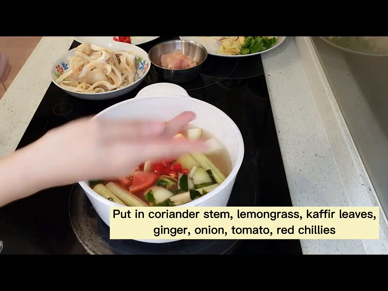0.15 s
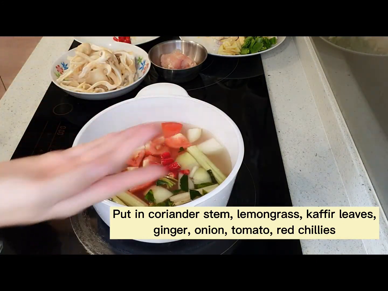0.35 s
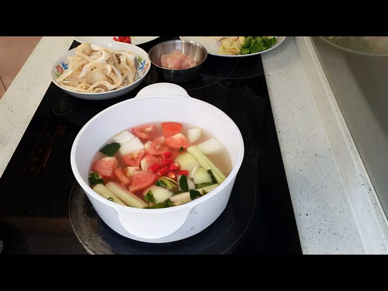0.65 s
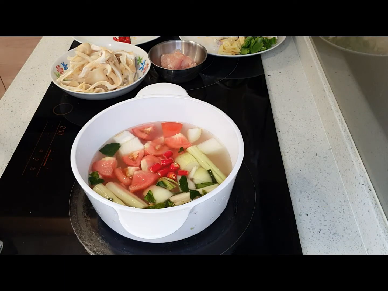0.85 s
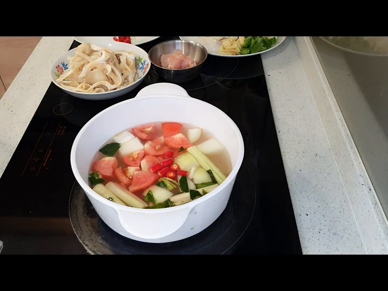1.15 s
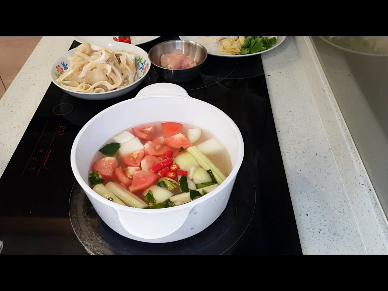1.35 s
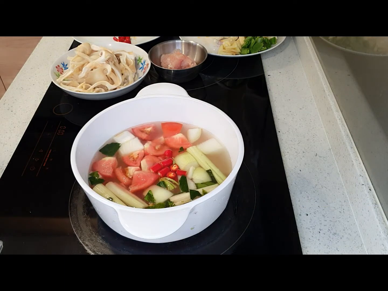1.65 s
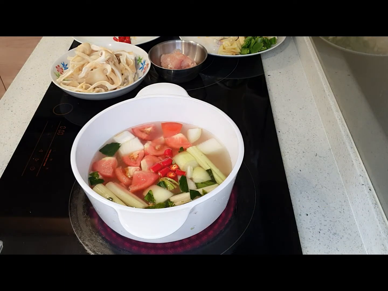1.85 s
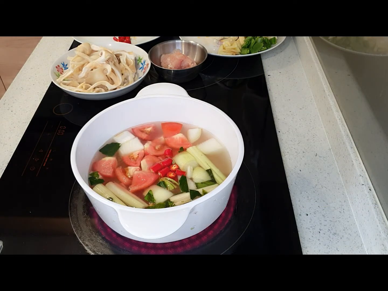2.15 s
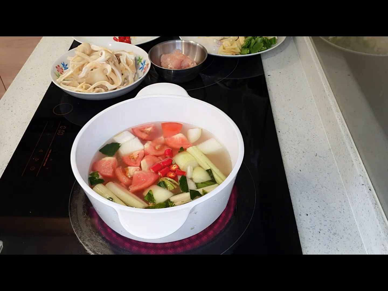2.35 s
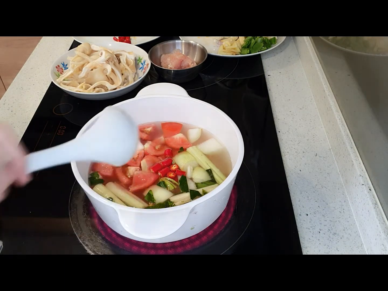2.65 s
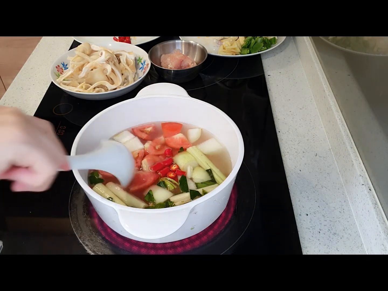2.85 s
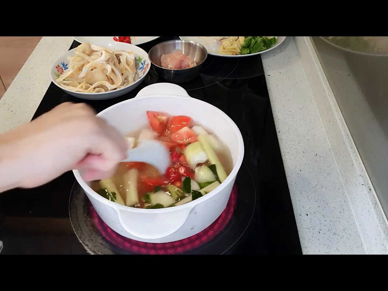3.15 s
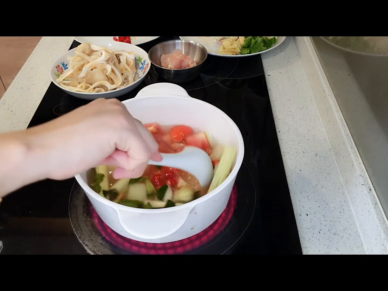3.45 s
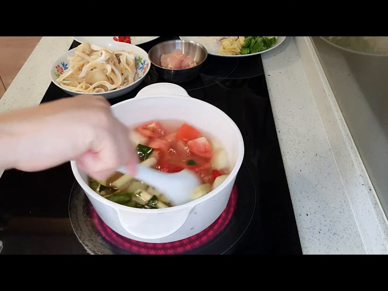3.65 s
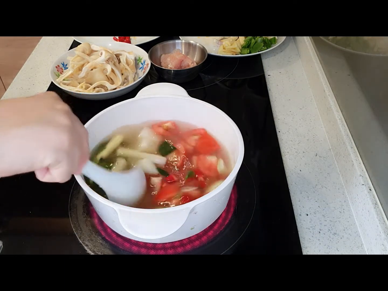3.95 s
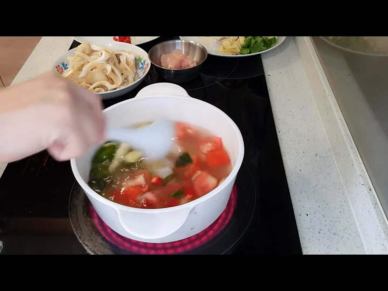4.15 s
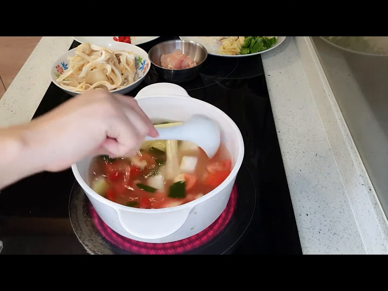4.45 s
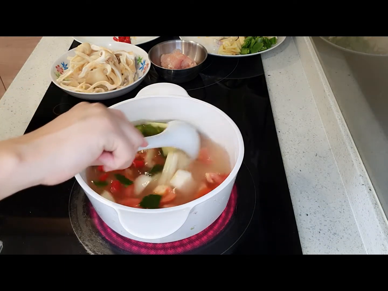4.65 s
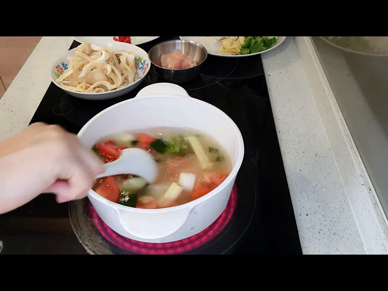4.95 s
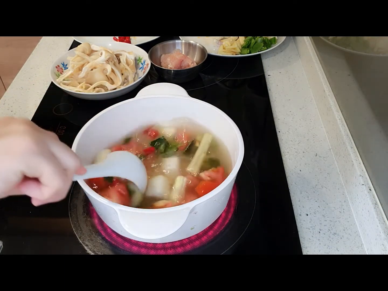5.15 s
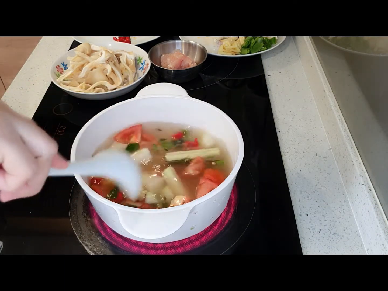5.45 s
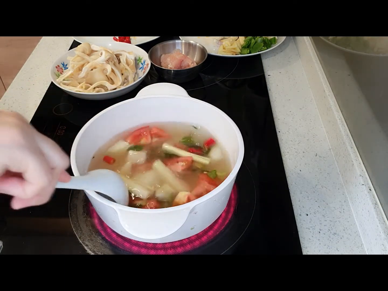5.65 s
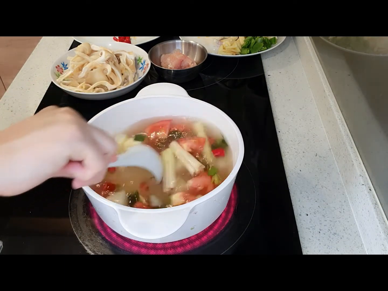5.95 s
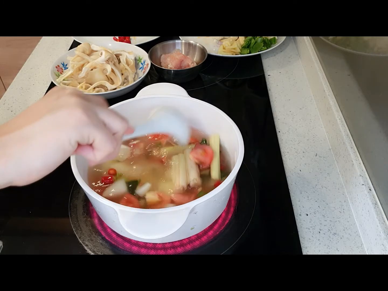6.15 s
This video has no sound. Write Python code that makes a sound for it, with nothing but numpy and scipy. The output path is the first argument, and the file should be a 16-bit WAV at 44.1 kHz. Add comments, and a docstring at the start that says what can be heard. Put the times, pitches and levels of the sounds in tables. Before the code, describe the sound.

In a hard-walled kitchen, a steady low hum and soft air rush run throughout. Faint dull thuds and cloth rustles come first, then a tiny scrape and quick bright crockery clink around two seconds. A ladle knocks sharply inside a pot at three, broth sloshes and bubbles softly with wet ticks, a dull bump follows near five, and a ringing rim tap comes later. Close stereo microphone above the pot.

```python
"""Over a hob's hum and a soft rush of air, the listener first hears a cook's dull thuds and rustling cloth.
A ladle scrapes and clinks on crockery, knocks on a pot's floor, then taps its rim with a faint second blow.
Struck bodies are sums of decaying modes behind a noisy crack, and random slips make the scrape.
The stirred soup is swelling filtered noise and resonant bubbles; crackles and rising blips are small wet ticks.
Overlapping reflections in a hard-walled kitchen prolong the blows, the scrape, the ticks and the bubbles."""
import sys
import numpy as np
from scipy import signal
from scipy.fft import rfft, irfft
from scipy.io import wavfile
from scipy.ndimage import uniform_filter1d

SR = 44100
rng = np.random.default_rng(int(sys.argv[2]) if len(sys.argv) > 2 else 0)


def output_pcm(signal):
    """Save a mono or channel-first signal as 16-bit PCM at the path in sys.argv[1].

    Samples are clipped to [-1, 1] before scaling.
    """
    pcm = np.clip(np.atleast_2d(signal).T, -1, 1) * 32767
    wavfile.write(sys.argv[1], SR, np.round(pcm).astype(np.int16))


N = 277830
TIME = np.arange(N) / SR

# Blows of the ladle on each body. Each row: start in seconds, relative level in dB, contact brightness in Hz.
CLINK_BLOWS = [(2.0393, -22, 14200), (2.0455, -23.5, 14000), (2.0518, -28.5, 12000), (2.129, -37.5, 4000)]
KNOCK_BLOWS = [(3.0352, -13, 12500), (3.0425, -19, 1800), (3.3272, -24, 4300), (4.872, -20.5, 70.5)]
RIM_BLOWS = [(5.5518, -17.5, 13700), (5.608, -36.5, 7000)]
# Clear ringing modes of each body. Each row: frequency in Hz, relative level in dB, t60 in seconds.
CROCKERY_MODES = [(505, -24, .3), (2013, -17, .3), (2500, -6.5, .08), (2783, -15, .13), (3080, -17, .2),
                  (3860, -16, .28), (4370, -19, .2), (4560, -11, .24), (4700, -16, .3), (5850, -13, .22),
                  (6040, -14, .18), (7542, -21, .28), (7760, -19, .12), (8380, -15, .1), (9130, -19, .3),
                  (9310, -13, .3), (10100, -13, .18), (10870, -20, .14), (11200, -15, .2),
                  (13310, -15, .17)]
POT_FLOOR_MODES = [(58, -25, .35), (112, -10, .13), (165, -14, .11), (262, -16, .1), (850, -18, .12),
                   (1013, -17, .1), (1400, -19, .12), (1540, -19, .15), (1827, -11, .1), (1975, -16.5, .17),
                   (7950, -19, .05), (8800, -23, .1), (11900, -29, .08)]
POT_RIM_MODES = [(571, -16, .2), (1500, -21, .2), (1800, -21, .2), (2460, -12, .36), (2805, -25, .3),
                 (3500, -23, .08), (3763, -8, .33), (3830, -8, .22), (3960, -16, .18), (5410, -15, .34),
                 (7429, -27, .2), (8590, -18, .25)]
# Dense, quickly damped modes of each body. Each row: frequency in Hz, relative level in dB per Hz.
CROCKERY_CRACK = [(250, -9), (500, -8.5), (1000, -2), (1600, -2.5), (2100, -10), (2600, 5.5), (3500, -6.5),
                  (4600, -3), (5400, -9.5), (6000, 1), (6800, -23), (8400, -9), (11400, -19), (14500, -61)]
FLOOR_CRACK = [(60, -37), (240, -5), (380, -5), (560, -5), (700, -11.5), (1100, 0.5), (1400, -2),
               (1950, -1), (2550, -8.5), (4100, -5), (5800, -11), (6800, -18), (8200, -16), (10500, -23),
               (12200, -20.5), (16000, -48)]
RIM_CRACK = [(300, -16.5), (600, -8), (1000, -11), (1350, 1.5), (2500, 3), (3000, -5.5), (3800, 11),
             (4700, -8.5), (5400, -2), (6300, -12), (8700, -8.5), (11000, -15.5), (13500, -22),
             (15500, -50)]

# Modes that sing while the ladle slides. Each row: frequency in Hz, relative level in dB.
SINGING_MODES = [(520, -3), (980, 0), (1470, -2), (2200, -2), (3080, -3), (4370, -14), (5820, -16),
                 (9200, -25)]
# Colour of the sliding rasp. Each row: frequency in Hz, relative level in dB per Hz.
RASP_COLOUR = [(300, -9), (520, -16), (1000, 5.5), (1500, -6), (2800, -6.5), (3700, -13.5),
               (5200, -33.0), (11000, -32), (15000, -59)]
# The slide grows until the ladle slips free; growth and fade are time constants.
SLIDE_PEAK_S, SLIDE_DB, SLIDE_GROWTH_S, SLIDE_FADE_S = 1.999, -31.5, 0.016, 0.025

# Brief crisp touches. Each row: start in seconds, relative level in dB, treble against body in dB, t60 in seconds.
TOUCHES = [(.535, -46, -8, 0.12), (2.857, -45, -8, 0.027), (3.933, -42, -4.5, 0.058),
           (5.017, -46.5, 6, 0.037)]
# Two colours of a touch. Each row: frequency in Hz, relative level in dB per Hz.
TOUCH_BODY = [(400, -2), (1300, 1), (2000, -2.5), (3000, -1.5), (6000, -12), (14000, -22)]
TOUCH_TREBLE = [(5000, -10), (8000, -4), (9700, 2), (12000, -15), (15500, -32)]
# Small wet clicks of the ladle, drops and bursting bubbles.
# Each row: start in seconds, relative level in dB, initial pitch in Hz.
WET_TICKS = [(2.865, -48, 1900), (3.511, -42, 2900), (4.378, -57, 10500), (4.473, -50, 10000),
             (4.722, -59, 12500), (4.862, -30, 2750), (4.865, -33, 1200), (4.878, -35, 1250),
             (4.912, -43, 2200), (4.99, -44, 2350), (5.269, -56, 12500), (5.333, -49, 9600),
             (6.0175, -39.5, 3500)]
TICK_OCTAVES, TICK_T60_S = 0.38, 0.021   # spread of the crackle around the pitch; its decay
# The ring of a wet tick: level against the crackle, cycles to fall 60 dB, relative rise of pitch.
BLIP_DB, BLIP_CYCLES, BLIP_RISE_PER_S = -7, 62, 2.2

# Strokes through the broth. Each row: start in seconds, length in seconds, relative slosh and splash in dB.
STROKES = [(3.718, 0.055, -57.5, -75), (3.93, 0.21, -57.5, -71), (4.225, 0.12, -51.5, -56),
           (4.492, .07, -59.5, -73), (4.765, 0.13, -50.5, -52.5), (5.1, 0.11, -58, -71),
           (5.655, 0.091, -56.5, -66), (5.907, 0.093, -54.5, -60.5), (6.19, .1, -54, -59.5)]
STROKE_ATTACK_S, STROKE_RELEASE_S = 0.07, 0.21
SURGE_DB = -6.5   # low surge of a stroke, relative to its slosh
# While the ladle is in the pot the broth churns and fizzes steadily.
STIR_START_S, STIR_LENGTH_S, STIR_ATTACK_S, STIR_RELEASE_S = 3.24, 2.2, .2, .7
CHURN_DB, FIZZ_DB = -56, -70   # relative levels
# Collapsing patches of fine foam. Each row: start in seconds, length in seconds, relative level in dB.
FOAM_PATCHES = [(5.06, 0.088, -72), (5.24, 0.072, -69)]
FOAM_ATTACK_S, FOAM_RELEASE_S = 0.024, 0.043
# Colour of the foam. Each row: frequency in Hz, relative level in dB per Hz.
FOAM_COLOUR = [(8000, -26), (11500, 2), (13000, 0), (15500, -5), (17000, -25)]

# The cook moves about. Each row: start in seconds, length in seconds, relative rustle and brushing in dB.
GESTURES = [(-.04, .12, -55, -67.5), (.25, .06, -62, -71), (0.947, 0.09, -60.5, -63),
            (1.184, .08, -60.5, -77), (1.408, 0.092, -54.5, -55.5), (1.87, .1, -58.5, -75),
            (2.182, 0.084, -54, -57), (2.446, 0.071, -58.5, -65)]
GESTURE_ATTACK_S, GESTURE_RELEASE_S = 0.053, .22
# Soft, dull thuds as the cook shifts and stirs. Each row: start in seconds, relative level in dB.
THUDS = [(0.02, -50.5), (.24, -51), (.96, -49.5), (1.2, -48), (1.46, -45), (1.85, -50.5), (1.97, -46),
         (2.21, -46), (2.448, -46), (2.57, -49), (2.68, -48), (3.73, -46), (4.18, -49.5), (4.51, -47.5),
         (5.66, -46.5), (6.0, -50)]
THUD_ATTACK_S, THUD_LENGTH_S, THUD_RELEASE_S = 0.012, 0.037, 0.1
# Light hissing swishes. Each row: start in seconds, length in seconds, relative level in dB.
SWISHES = [(1.18, 0.096, -71), (1.44, 0.16, -72), (2.42, 0.15, -62.5)]
SWISH_ATTACK_S, SWISH_RELEASE_S = 0.053, 0.065
# Colours of moving cloth and liquid. Each row: frequency in Hz, relative level in dB per Hz.
LOW = [(70, -53.5), (130, -0.5), (185, 6), (260, -4.5), (400, -14.5), (900, -56)]
MIDDLE = [(220, -10), (380, -8.5), (510, 2.5), (640, -6.5), (800, -1), (1100, -16.5), (2500, -71)]
UPPER = [(550, -12), (950, 5.5), (1300, 6.5), (2150, -4.5), (2700, -15), (5000, -24), (10000, -52)]
HISS = [(1200, 15), (2600, 8.5), (4000, 10), (7000, -5), (9800, 3.5), (12000, -20), (15500, -22)]

# Steady hum and whine of the hob. Each row: frequency in Hz, relative rms level in dB.
HUM_TONES = [(100, -46.5), (200, -69.5), (300, -77.5), (6638, -88.5)]
# Steady rush of air. Each row: frequency in Hz, relative level in dB per Hz.
AIR_COLOUR = [(22, -25), (32, -11), (42, 2.5), (60, -1), (90, 4), (125, 0.5), (185, -2), (310, -10.5),
              (520, -11), (1000, -19), (2000, -25.5), (4000, -30), (9000, -39.5), (15500, -51.5)]
# Likeness of diffuse noise at the two ears. Each row: frequency in Hz, left-right correlation from 0 to 1.
EAR_LIKENESS = [(60, 1), (160, 1), (300, 0.52), (600, 0.42), (1200, 0), (3000, 0), (12000, 0)]
# Decay of the room. Each row: frequency in Hz, t60 in seconds.
KITCHEN_DECAY = [(100, .4), (500, .47), (2000, .57), (5000, .56), (9000, .45), (13000, .29)]
CUTOFF_HZ = 15600


def ladle():
    """Impact and friction: the ladle clinks and slides on crockery, knocks on the pot's floor, taps its rim."""
    clink = struck(CLINK_BLOWS, CROCKERY_MODES, CROCKERY_CRACK, crack_t60=0.087, crack_db=3.5,
                   lag_ms=0.091, split=0.018, partners_db=-3.0)
    knock = struck(KNOCK_BLOWS, POT_FLOOR_MODES, FLOOR_CRACK, crack_t60=0.061, crack_db=-2.5,
                   lag_ms=0.039, split=0.047, partners_db=-10.0)
    tap = struck(RIM_BLOWS, POT_RIM_MODES, RIM_CRACK, crack_t60=0.046, crack_db=5.5,
                 lag_ms=0.095, split=0.0118, partners_db=-7.5)
    return (kitchen(pan(clink + slide(), left_db=-2.6), wet_db=-9.0)
            + kitchen(pan(knock, left_db=-1.5), wet_db=-5.5)
            + kitchen(pan(tap, left_db=-1.5), wet_db=-7.0))


def struck(blows, modes, crack, crack_t60, crack_db, lag_ms, split=.012, partners_db=-7):
    """Modal superposition: a blow wakes a short crack and clear modes; a soft contact dulls both."""
    out, t = np.zeros((2, N)), TIME[:SR // 3]
    arrival = t - [[0], [lag_ms / 1000]]   # the clear modes lag at the right ear
    onset = 1 - np.exp(-t / 0.00019)
    for s, level_db, bright_hz in blows:
        sound = from_db(crack_db) * noise(crack, size=len(t)) * decay(t, crack_t60)
        for hz, mode_db, t60 in modes:
            # the body is not quite round: weaker partners above and below beat against each mode
            detuning = split * rng.uniform(0.39, 1, (2, 1, 1)) * [[[-1]], [[1]]]
            partners = hz * (1 + detuning)
            beating = np.sin(2 * np.pi * (partners * t + rng.random((2, 2, 1)))).sum(0)
            tone = np.sin(2 * np.pi * hz * arrival) * rng.choice([-1, 1])
            sound += from_db(mode_db) * (tone + from_db(partners_db) * beating) * decay(t, t60)
        # one-pole low-pass at the contact brightness
        soft = np.exp(-2 * np.pi * bright_hz / SR)
        dulled = signal.lfilter([1 - soft], [1, -soft], sound * onset)
        add(out, s, from_db(level_db) * dulled)
    return out


def slide(slips_per_s=900, ring_db=-5, rasp_db=-3.0):
    """Sliding friction: rapid random slips set the crockery singing beneath a noisy rasp."""
    slips = (rng.random((2, N)) < slips_per_s / SR) * rng.standard_normal((2, N))
    singing = rms_one(sum(from_db(db) * ring(slips, hz, .12) for hz, db in SINGING_MODES))
    muffled = signal.sosfilt(signal.butter(2, 7000, fs=SR, output="sos"), singing)
    rasp = noise(RASP_COLOUR)
    since = TIME - SLIDE_PEAK_S
    distance = np.maximum(-since / SLIDE_GROWTH_S, since / SLIDE_FADE_S)   # from the peak, in time constants
    pressure = np.exp(-np.minimum(distance, 20))
    return from_db(SLIDE_DB) * pressure * (from_db(rasp_db) * rasp + from_db(ring_db) * muffled)


def ticks():
    """Transients and resonance: touches crackle broadly; wet ticks crackle narrowly and ring with a rising blip."""
    out, t = np.zeros((2, N)), TIME[:SR // 5]
    onset = 1 - np.exp(-(t / .0007) ** 2)
    for s, level_db, treble_db, t60 in TOUCHES:
        body = noise(TOUCH_BODY, size=len(t))
        treble = from_db(treble_db) * noise(TOUCH_TREBLE, size=len(t))
        add(out, s, from_db(level_db) * rms_one(body + treble) * onset * decay(t, t60))
    for s, level_db, hz in WET_TICKS:
        hill = [(hz * 2 ** (k * TICK_OCTAVES), -6 * k * k) for k in range(-3, 4)]
        crackle = noise(hill, size=len(t)) * decay(t, TICK_T60_S)
        cycles = hz * t * (1 + BLIP_RISE_PER_S * t / 2)
        blip = from_db(BLIP_DB) * np.sin(2 * np.pi * cycles) * decay(t, BLIP_CYCLES / hz)
        add(out, s, from_db(level_db) * onset * (crackle + blip))
    return kitchen(pan(out, left_db=-2.0), wet_db=-4.0)


def soup():
    """Flow noise and bubble resonance: the broth surges, folding in bubbles; fine froth bursts on top."""
    stirring = swell(STIR_START_S, STIR_LENGTH_S, 0, STIR_ATTACK_S, STIR_RELEASE_S)
    slosh = swells([(s, length, db) for s, length, db, _ in STROKES], STROKE_ATTACK_S, STROKE_RELEASE_S)
    splash = swells([(s, length, db) for s, length, _, db in STROKES], STROKE_ATTACK_S, STROKE_RELEASE_S)
    surge = np.hypot(from_db(CHURN_DB) * stirring, from_db(SURGE_DB) * slosh)
    fizz = from_db(FIZZ_DB) * stirring
    flow = (surge * noise(LOW) + from_db(2.8) * slosh * noise(MIDDLE)
            + from_db(0.5) * splash * noise(UPPER) + from_db(6.0) * fizz * noise(HISS))
    bubbles = from_db(-12.0) * slosh * grains(per_s=110, low_hz=434, high_hz=1360, cycles=30, spread_db=5.5)
    spatter = from_db(-16) * splash * grains(per_s=300, low_hz=1300, high_hz=3430, cycles=7, spread_db=4.5)
    froth = from_db(-12.5) * fizz * grains(per_s=300, low_hz=4000, high_hz=11000, cycles=8.5, spread_db=4.5)
    foam = swells(FOAM_PATCHES, FOAM_ATTACK_S, FOAM_RELEASE_S) * noise(FOAM_COLOUR)
    return flow + foam + kitchen(pan(bubbles + spatter + froth, left_db=-3.5), wet_db=2.5)


def grains(per_s, low_hz, high_hz, cycles, spread_db, count=10):
    """Bubble resonance: random births ring at one of several pitches, falling 60 dB in some cycles; rms 1."""
    heights = from_db(spread_db * np.minimum(rng.exponential(1, N), 4)) * rng.choice([-1, 1], N)
    born = rng.random(N) < per_s / SR
    dealt = rng.integers(0, count, N)   # which pitch each bubble takes
    pitches = np.geomspace(low_hz, high_hz, count)
    return rms_one(sum(ring(heights * born * (dealt == k), hz, cycles / hz) for k, hz in enumerate(pitches)))


def cook():
    """Broadband friction and dull impact: swelling coloured noise makes shuffles, rustles and swishes."""
    thuds = swells([(s, THUD_LENGTH_S, db) for s, db in THUDS], THUD_ATTACK_S, THUD_RELEASE_S)
    rustle = swells([(s, length, db) for s, length, db, _ in GESTURES], GESTURE_ATTACK_S, GESTURE_RELEASE_S)
    brushing = swells([(s, length, db) for s, length, _, db in GESTURES], GESTURE_ATTACK_S, GESTURE_RELEASE_S)
    hiss = swells(SWISHES, SWISH_ATTACK_S, SWISH_RELEASE_S)
    return (from_db(-0.5) * thuds * noise(LOW) + from_db(3.5) * rustle * noise(MIDDLE)
            + from_db(3.5) * brushing * noise(UPPER) + from_db(6.5) * hiss * noise(HISS))


def hob(air_db=-49.5):
    """Steady tones and noise: mains hum with a faint whine, over the rush of air."""
    tones = sum(from_db(db) * np.sin(2 * np.pi * (hz * TIME + rng.random())) for hz, db in HUM_TONES)
    hum = tones * np.sqrt(2)   # rms to peak
    return hum + from_db(air_db) * noise(AIR_COLOUR)


def kitchen(x, wet_db):
    """Reverberation: hard walls return a dense, even tail that dies soonest in the high treble."""
    t, tail = TIME[:SR * 2 // 3], 0
    white = rfft(noise([(20, 0), (20000, 0)], size=len(t)))
    hz = np.linspace(0, SR / 2, white.shape[1])
    for centre, t60 in KITCHEN_DECAY:
        # overlapping bands, each with its own decay
        share = at_hz([(f, f == centre) for f, _ in KITCHEN_DECAY], hz)
        tail = tail + irfft(white * share) * decay(t, t60)
    # so many reflections overlap that no narrow band stands out
    response = rfft(tail * (1 - np.exp(-t / 0.0014)), 2 * len(t))
    response /= np.sqrt(uniform_filter1d(np.abs(response) ** 2, size=60))
    reflections = signal.oaconvolve(x, irfft(response)[:, :len(t)], axes=1)[:, :N]
    return x + from_db(wet_db) * reflections


def noise(spectrum, size=N):
    """Diffuse field: stereo noise of a given colour, alike at both ears in the bass; rms 1."""
    hz = np.arange(size // 2 + 1) * SR / size
    mid, side = rfft(rng.standard_normal((2, size)))
    alike = np.clip(at_hz(EAR_LIKENESS, hz), -1, 1)
    both = np.sqrt(1 + alike) * mid + np.sqrt(1 - alike) * side * [[1], [-1]]
    return rms_one(irfft(both * from_db(at_hz(spectrum, hz)), size))


def ring(clicks, hz, t60):
    """Damped resonance: a unit click sets a sine of height 1 ringing."""
    r = from_db(-60 / (t60 * SR))   # decay per sample
    w = 2 * np.pi * hz / SR
    return signal.lfilter([0, np.sin(w)], [1, -2 * r * np.cos(w), r * r], clicks + 1e-18)


def decay(t, t60):
    """Exponential damping: fall by 60 dB in t60."""
    return np.exp(-np.log(1000) * t / t60)


def swell(start, length, level_db, attack_s, release_s):
    """Envelope of one movement: a linear rise, a hold to its length, then exponential decay."""
    since = TIME - start
    rise = np.clip(since / attack_s, 0, 1)
    return from_db(level_db) * rise * np.exp(-np.maximum(since - length, 0) / release_s)


def swells(rows, attack_s, release_s):
    """Incoherent addition: movements of (start, length, dB) overlap and add in power."""
    return np.sqrt(sum(swell(*row, attack_s, release_s) ** 2 for row in rows))


def from_db(db):
    """Logarithmic level: decibels to amplitude gain."""
    return 10 ** (np.asarray(db) / 20)


def rms_one(x):
    """Normalisation: scale to unit rms."""
    return x / np.sqrt(np.mean(x ** 2) + 1e-20)


def at_hz(points, hz):
    """Interpolation: read a table on a log-frequency axis."""
    f, value = np.transpose(points)
    return np.interp(np.log(hz + 1e-3), np.log(f), value)


def pan(x, left_db):
    """Interaural level difference: left over right in dB; negative leans to the right."""
    return x * from_db([[left_db / 2], [-left_db / 2]])


def add(out, s, sound):
    """Superposition: mix a sound in at a time in seconds."""
    at = round(s * SR)
    out[..., at:at + sound.shape[-1]] += sound[..., :N - at]


def scene():
    """Superposition of every source, as heard from above the pot."""
    return ladle() + ticks() + pan(cook() + soup(), left_db=-2.0) + pan(hob(), left_db=-1.5)


def record(dry):
    """Band limiting: the microphone sheds the deepest bass; the top is cut steeply."""
    thinned = signal.sosfilt(signal.butter(5, 36, "high", fs=SR, output="sos"), dry)
    return signal.sosfilt(signal.ellip(10, .1, 90, CUTOFF_HZ, fs=SR, output="sos"), thinned)


dry = scene()
out = record(dry)
output_pcm(out)
```